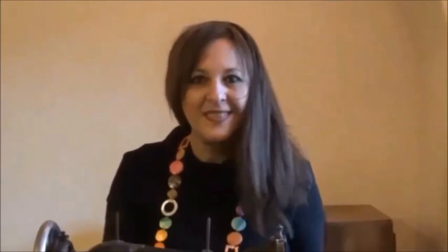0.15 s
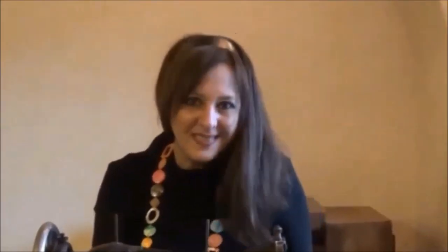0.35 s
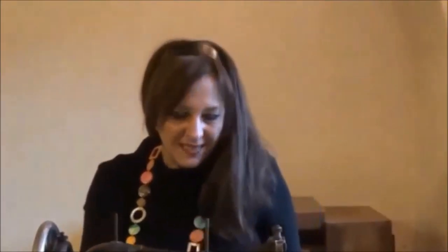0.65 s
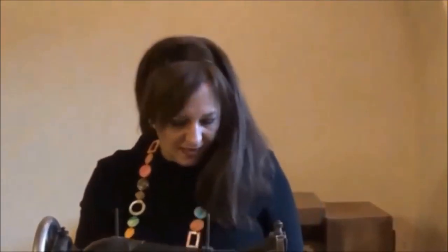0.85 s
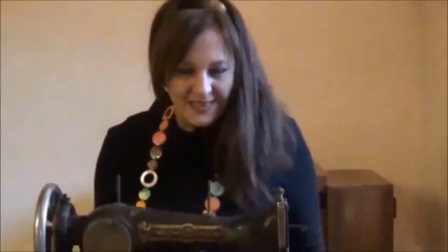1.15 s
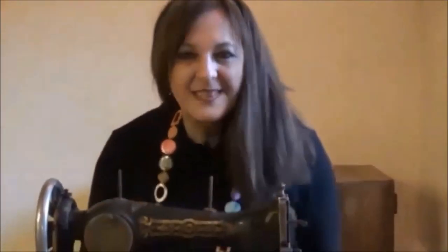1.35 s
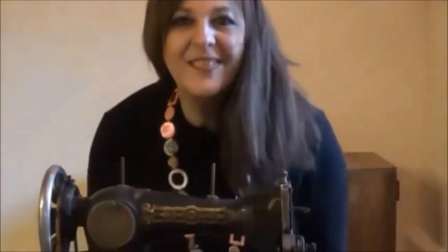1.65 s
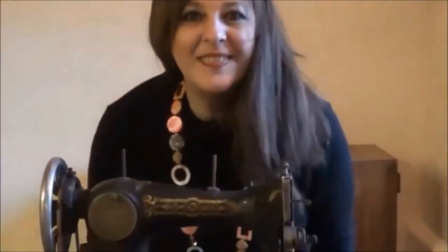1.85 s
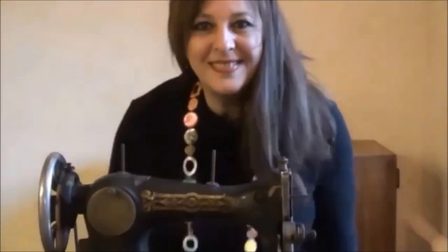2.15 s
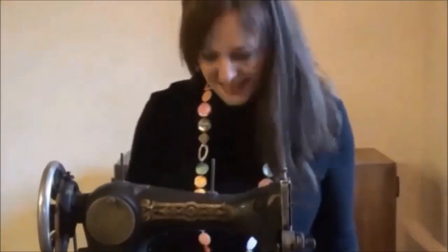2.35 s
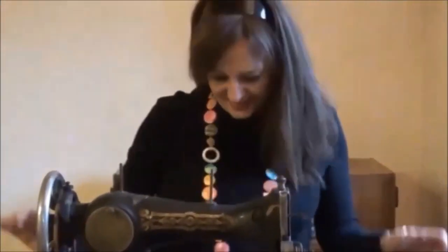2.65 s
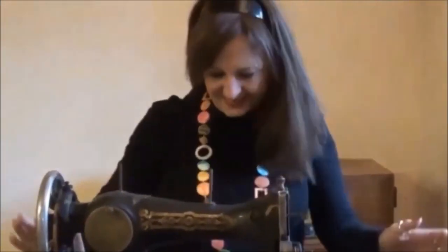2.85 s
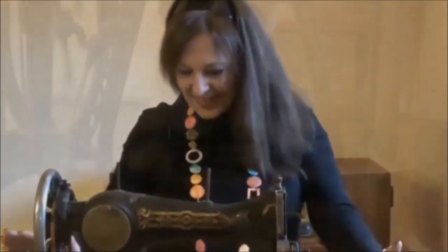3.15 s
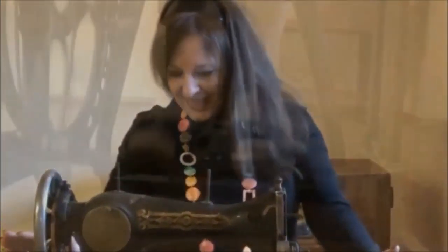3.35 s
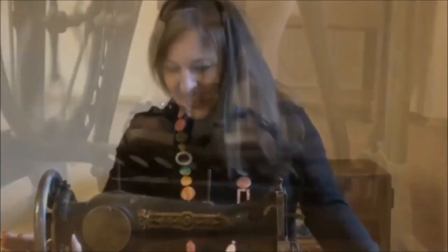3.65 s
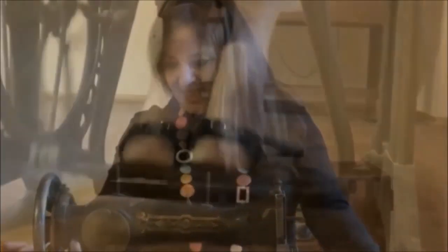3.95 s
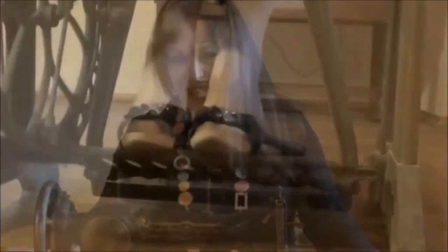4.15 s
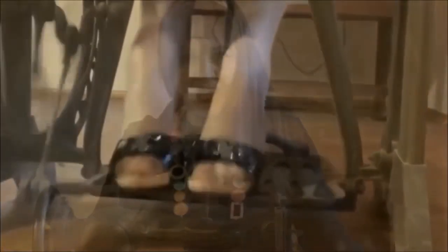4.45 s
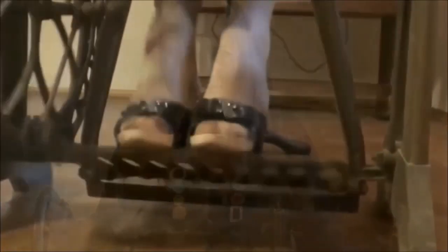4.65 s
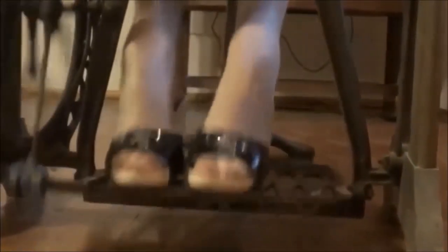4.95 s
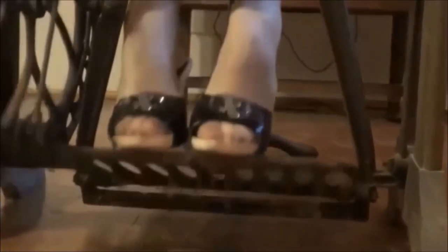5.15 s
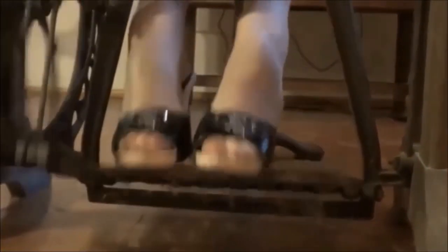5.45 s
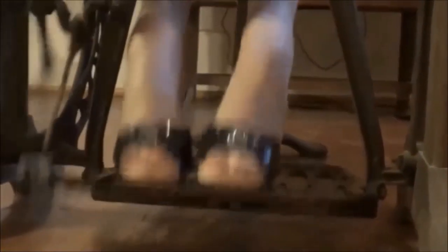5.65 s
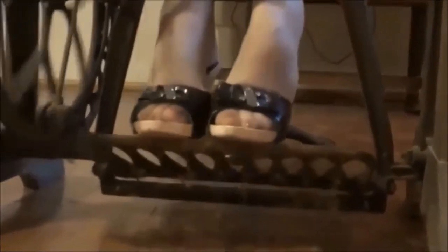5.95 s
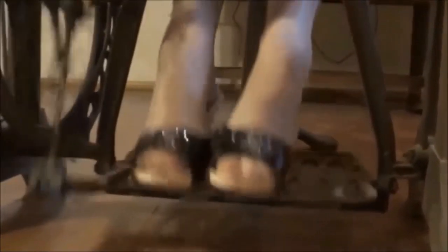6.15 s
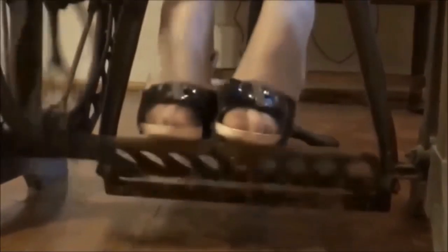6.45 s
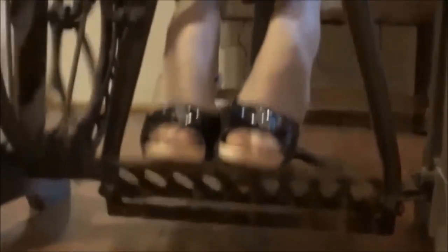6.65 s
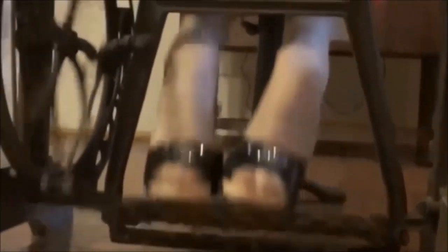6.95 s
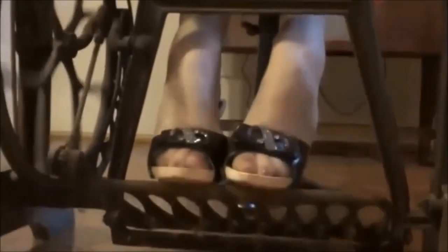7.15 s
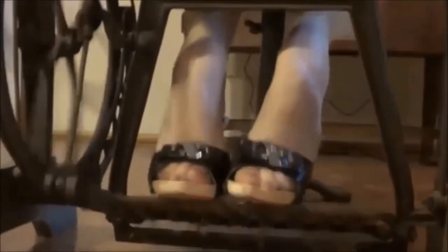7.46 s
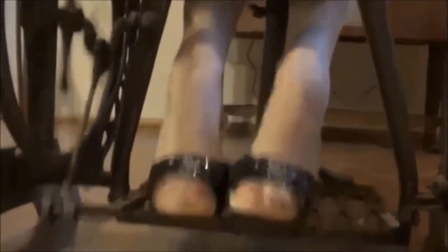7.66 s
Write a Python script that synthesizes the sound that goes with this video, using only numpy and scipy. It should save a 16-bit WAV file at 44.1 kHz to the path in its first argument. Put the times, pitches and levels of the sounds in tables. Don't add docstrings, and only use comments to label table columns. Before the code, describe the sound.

A cast-iron treadle machine in a bare echoing room: uneven knocks and floor thumps, a clanging flurry around two seconds, then spaced double-knock strokes.

```python
import sys
import numpy as np
from scipy import signal
from scipy.fft import rfft, irfft, next_fast_len
from scipy.io import wavfile
from scipy.ndimage import uniform_filter1d, minimum_filter1d

SR = 44100
rng = np.random.default_rng(int(sys.argv[2]) if len(sys.argv) > 2 else 0)


def master(y):
    cut = np.clip(np.atleast_2d(y).T, -1, 1)
    pcm = np.round(cut * 32767)
    wavfile.write(sys.argv[1], SR, pcm.astype(np.int16))


def linear_from_db(decibels):
    return 10 ** (np.asarray(decibels, float) / 20)


N = 343980


def unit(x):
    return x / np.sqrt(np.mean(x ** 2) + 1e-20)


def along(points, hz):
    f, v = np.transpose(points)
    return np.interp(np.log(hz + 1), np.log(f + 1), v)


def filtered(x, response):
    m = next_fast_len(x.shape[-1] + 8192)
    spectrum = rfft(x, m) * response(np.fft.rfftfreq(m, 1 / SR))
    return irfft(spectrum, m)[..., :x.shape[-1]]


def modes(peaks, low_hz=20, top_hz=12000, damping=1):
    def response(f):
        h = 0
        for k, (centre, width, db) in enumerate(peaks):
            drag = 1j * f * width
            h = h + (-1) ** k * linear_from_db(db) * drag / (centre * centre - f * f + drag * damping)
        h = h * f * f / (low_hz ** 2 - f * f + 1.2j * f * low_hz)
        h = h / (1 - (f / top_hz) ** 2 + 1.2j * f / top_hz)
        return h / np.sqrt(np.mean(np.abs(h) ** 2))
    return response


def shape(points):
    return lambda f: unit(linear_from_db(along(points, f)))


def add(track, s, x):
    part = track[round(s * SR):][:len(x)]
    part += x[:len(part)]


def patchy(depth_db, bins, frames):
    z = signal.stft(rng.standard_normal((2, N)), nperseg=512)[2]
    field = uniform_filter1d(rng.standard_normal(z.shape[1:]), bins, axis=0)
    field = uniform_filter1d(field, frames, axis=1)
    return unit(signal.istft(z * linear_from_db(depth_db * unit(field)), nperseg=512)[1][:, :N])


def near(dry):
    return np.array([dry, .5 * np.roll(dry, 60)])


def in_room(sent, t60, build):
    power = sent ** 2
    for tau in (build, t60 / (2 * np.log(1000))):
        pole = np.exp(-1 / (tau * SR))
        power = signal.lfilter([1 - pole], [1, -pole], power)
    return np.sqrt(power) * patchy(depth_db=2.5, bins=2, frames=10)


# time in seconds, level in
# dB.
BACKGROUND = [(.15, -1.5), (1.2, -2.2), (3.5, 0.5), (3.71, -3), (3.77, -6.5), (4.75, -6), (5.4, -1.3), (7, 3.5),
              (7.8, 0.5)]


def background_db():
    s, db = np.transpose(BACKGROUND)
    return np.interp(np.arange(N) / SR, s, db)


# frequency in Hz, density in dB per Hz.
HISS = [(410, -9), (700, -0.5), (2510, -7), (3020, -8), (3350, -5.5), (4480, -10), (9860, -27),
        (11200, -37), (14600, -61), (22000, -120)]


def hiss():
    return linear_from_db(-61.5) * filtered(rng.standard_normal((2, N)), shape(HISS))


# frequency in Hz, density in dB per Hz.
RUMBLE = [(12, -32), (25, -10), (60, -2), (130, -5), (250, 2), (400, -6), (700, -8), (1100, -16),
          (1600, -26), (3300, -120)]


def rumble():
    return linear_from_db(-52 + background_db()) * filtered(rng.standard_normal((2, N)), shape(RUMBLE))


# frequency in Hz, density in dB per Hz.
RUSTLE = [(710, -25), (1200, -14), (1490, -2), (2160, -3.5), (2630, -3), (3930, -10.5), (9830, -5.5),
          (11200, -11.5), (14600, -46), (22000, -120)]
# middle in seconds, half length in seconds, level in dB.
SWISHES = [(.5, 0.13, -60), (.86, 0.052, -48), (1.412, 0.15, -47.5), (1.75, 0.48, -51.5),
           (2.516, 0.16, -50.5), (2.953, 0.5, -50), (3.54, 0.17, -52), (4.332, 0.17, -60.5),
           (5.806, 0.051, -53.5), (6.684, 0.13, -49.5), (7.197, 0.063, -73)]


def rustle():
    t = np.arange(N) / SR
    level = linear_from_db(-63.5 + 0.74 * background_db())
    for middle, half, db in SWISHES:
        level = level + linear_from_db(db - 9.5) * np.exp(-((t - middle) / half) ** 2)
    return level * filtered(patchy(depth_db=1.2, bins=14, frames=20), shape(RUSTLE))


# start in seconds, level in dB, pitch in Hz, body in dB re
DRY_TICKS = [(5.191, -30, 4000, 10), (.3085, -25, 4300, 5), (.425, -45, 8000, -5), (.55, -42, 8500, 5),
             (5.4517, -37, 8500, -15), (5.471, -30, 5000, -5), (5.8024, -36, 9500, -10),
             (5.84, -24, 9500, -10), (5.985, -28, 9000, -10), (5.996, -28, 10000, -10),
             (6.022, -30, 9500, -10), (6.032, -32, 10300, -10), (5.201, -20, 8200, -10),
             (2.214, -34, 9000, -5), (7.1055, -6, 4500, 6), (7.1075, -10, 7500, 0),
             (3.324, -28, 4300, 10), (.839, -22, 3000, 8),
             (0.3142, -16.5, 4300, 9.5), (0.3571, -37, 9900, -2), (1.6944, -20, 4020, -4),
         (1.703, -16, 4430, 10), (2.234, -30, 4110, 8), (4.9343, -19, 4040, -7), (5.234, -10, 9900, 11),
         (5.4271, -29.5, 6000, 10), (5.4778, -11, 4300, 6), (5.5215, -35, 5980, 11),
         (5.878, -19.5, 7500, 1.5), (6.7993, -27, 4900, 16), (6.8704, -52, 4500, 26.5),
         (7.2535, -25, 10100, -14), (7.3776, -32, 10300, -23), (7.3991, -38, 8450, 2.1),
         (7.5494, -50, 4180, 3), (7.659, -52, 7490, 23), (7.6904, -30.5, 8800, -8), (7.7228, -26, 9300, -8),
         (7.7842, -28, 9100, -15)]
# start in seconds, level in dB, pitch in Hz, body in dB re tick.
JANGLES = [(2.2695, -29, 4340, 7), (2.296, -19, 8000, 13), (2.306, -6.5, 8100, 5),
           (2.9153, -28.5, 10000, -20), (4.966, -23.5, 10000, -7), (5.0715, -29.5, 9200, -10),
           (5.316, -27, 4130, 9), (5.7583, -31, 9100, -4), (5.975, -31, 9800, -11), (6.01, -30, 10000, -9),
           (6.397, -33.5, 10700, 1.5), (6.4968, -3.5, 5830, 9), (6.5854, -12, 8900, -5),
           (6.9504, -44, 4400, 17), (7.0439, -19, 10300, -9), (7.591, -18.5, 9100, -12)]


def ticks(rows, t60, room_db):
    dry, sent = np.zeros((2, N))
    t = np.arange(SR // 8) / SR
    for s, db, hz, body_db in rows:
        click = rng.standard_normal(len(t)) * linear_from_db(db - 15.5 - 60 * t / t60) * (1 - np.exp(-t / 0.00098))
        click[30] += 4 * linear_from_db(db - 15.5)
        bright = modes([(hz, 0.14 * hz, 0), (7500, 7000, -28)], low_hz=2570)
        dull = modes([(2020, 3500, 0)], low_hz=600, top_hz=4440)
        add(dry, s, filtered(click, lambda f: bright(f) + linear_from_db(body_db - 1.5) * dull(f)))
        add(sent, s, linear_from_db(room_db) * click)
    room = filtered(in_room(sent, 0.16, build=0.0045), modes([(8700, 14000, 0)], low_hz=3500))
    return near(dry) + room


def loose_parts():
    short = ticks(DRY_TICKS, t60=0.027, room_db=-15)
    return short + ticks(JANGLES, t60=0.066, room_db=-4)


# start in seconds, level in dB, board pitch in Hz,
# rebound delay in seconds, rebound in dB re blow.
STROKES = [
    (5.1955, -10.5, 380, 0.032, -8.5),
    (5.831, -14.5, 405, 0.03, -3),
    (6.483, -10, 294, .024, 1.5),
    (7.106, -13, 333, 0.029, -1.5),
]
# start in seconds, frame in dB, plate in dB re frame,
# brightness in dB re frame, direct sound in dB re room.
KNOCKS = [(0.838, -17, -10, -15, -2.5), (1.446, -19.5, -7, -22.5, -3), (1.607, -14.5, -8, -20.5, -1.5),
          (2.208, -25, -10, -14, -4), (2.243, -23, -11, -11.5, -7), (2.306, -12, -2.5, -6, -7.5),
          (2.365, -15, -3, -3, -5), (3.3235, -26, 3, -13, 3), (4.077, -39, -2.2, -18, 1.5),
          (4.247, -38, 4.5, -4.5, -5), (5.02, -29, -7.5, -12, 4), (6.641, -24, -9, -13, -3),
          (7.416, -34, -1, -18, -3), (7.491, -43, 10, 3, 2.1)]
# start in seconds, frame in dB, plate and brightness in dB re frame.
SHAKES = [(0.35, -44, -2, -12), (0.549, -46, -4, -4), (0.822, -36, 2, -12), (6.457, -32.5, -6, -14),
          (1.215, -58, -11, 7), (1.407, -46, 0, -3), (1.502, -25, -26, -33), (1.672, -27, -22, -16.5),
          (1.882, -35.5, 3, 7), (1.964, -12.5, -2, -7.5), (2.329, -12, -5.5, -7), (2.405, -18, -27, -18),
          (3.09, -48, -16, -38), (5.788, -36.5, 2, -6), (7.075, -34.5, 0.1, -12), (7.76, -46, -9, -10)]
SHAKE_DIRECT_DB = -5.5


def scrape():
    return [(1.892 + k * .016, -21.5 - k * 0.65, -1, 1.5, 7.5 - k, SHAKE_DIRECT_DB) for k in range(5)]


def blows():
    contacts = list(KNOCKS) + [(*row, SHAKE_DIRECT_DB) for row in SHAKES]
    for s, db, _, after, less_db in STROKES:
        contacts.append((s, db, -0.35, -7.5, -0.15))
        contacts.append((s + after, db + less_db, -13.5, -16.5, SHAKE_DIRECT_DB))
    crack_db = -9.5
    return scrape() + [(*row[:4], row[3] + crack_db, row[4]) for row in contacts]


def rattle(length, grain_db):
    t = np.arange(SR // 8) / SR
    grain = np.repeat(rng.standard_normal(len(t) // 40 + 1), 40)[:len(t)]
    return unit(rng.standard_normal(len(t)) * linear_from_db(grain_db * grain)) * np.exp(-(t / length) ** 2)


# frequency in Hz, width in Hz, level in dB.
FRAME = [(498, 32.6, -0.5), (581.4, 28.4, 2.5), (661.5, 52, 0.5), (736, 53, 0.5), (879, 83, -2)]
# frequency in Hz, width in Hz, level in dB.
PLATE = [(992, 47, 3), (1137, 97, -1), (1330, 130, -1), (1489, 43.5, 2.5), (1541, 67, -0.5),
         (1725, 35, -2.5)]
# frequency in Hz, width in Hz, level in dB.
LINKAGE = [(1878, 147, 12), (2290, 170, 10), (2680, 180, 5.5), (3380, 300, 0), (3515, 260, -4.5),
           (4300, 800, -6), (4700, 900, -8)]
# frequency in Hz, density in dB per Hz.
CRACK = [(1500, -60), (2500, -10), (3300, 0.5), (4300, -3.5), (5500, -9), (7000, -8.5), (9700, -9),
         (11200, -21), (14600, -42), (22000, -120)]
ROOM_T60_S = [0.58, 0.53, 0.57, 0.59, 0.54]


def softly_struck(part, contact_hz=2600):
    return lambda f: part(f) / (1 - (f / contact_hz) ** 2 + 1.4j * f / contact_hz)


def knocks():
    dry, sent = np.zeros((2, 4, N))
    for s, db, plate_db, linkage_db, crack_db, direct_db in blows():
        snap, shake = rattle(0.0018, grain_db=1.0), rattle(0.0065, grain_db=-2)
        snap = 0.68 * snap
        snap[0] += 6.13
        levels_db = db + 1.5, db + plate_db + 0.5, db + linkage_db + 1.5, db + crack_db + 4.5
        for part, level_db in enumerate(levels_db):
            add(dry[part], s, linear_from_db(level_db + direct_db) * snap)
            add(sent[part], s, linear_from_db(level_db) * shake)
    dry *= linear_from_db([[4], [4], [2], [-9]])
    iron = (FRAME, 400, 1100), (PLATE, 800, 2100), (LINKAGE, 1500, 6000)
    frame, plate, linkage = [modes(*part, damping=1.74) for part in iron]
    snapping = [softly_struck(frame), softly_struck(plate), linkage, modes([(7700, 3400, 0)], low_hz=4000)]
    split_hz, top_t60 = 7500, 0.32
    ringing_on = [modes(*part) for part in iron] + [lambda f: shape(CRACK)(f) / (1 + (f / split_hz) ** 4)]
    out = filtered(in_room(sent[3], top_t60, build=0.00035),
                   lambda f: 1.13 * shape(CRACK)(f) / (1 + (split_hz / (f + 1)) ** 4))
    for k in range(4):
        out = out + filtered(near(dry[k]), snapping[k])
        out = out + filtered(in_room(sent[k], ROOM_T60_S[k + 1], build=0.00047), ringing_on[k])
    return out


# start in seconds, level in dB, board pitch in Hz, joists in dB re board.
THUMPS = [(0.402, -25, 151, -12), (0.82, -29.5, 162, -25), (0.841, -18.5, 253, -37),
          (1.294, -41.5, 320, -24), (1.444, -21, 374, -31), (1.606, -11, 265, -30), (1.659, -14, 280, -43),
          (1.822, -35.5, 376, -37), (1.957, -14.5, 218, -22.5), (2.207, -14.5, 130, -8.5),
          (2.311, -10.5, 197, -24), (2.385, -9.5, 276, -36), (1.408, -33.5, 200, -16),
          (3.088, -31, 201, -33), (3.485, -32, 188, -29), (4.302, -32, 126.5, -9.5), (4.852, -30, 225, -21),
          (4.972, -24.5, 370, -14.5), (5.032, -19.5, 255, -10), (5.066, -25.5, 263, -23),
          (5.269, -16, 200, -17.5), (5.787, -33, 385, -25), (6.096, -38.5, 264.7, 1.5),
          (6.312, -36.5, 240, -19), (6.648, -20, 300, -15), (6.825, -33, 127, -8), (7.075, -28.5, 363, -15),
          (7.249, -27, 371, -20), (7.434, -26.5, 307, -7.5), (7.766, -34, 261, -27)]


def pushes():
    rows = list(THUMPS)
    for s, db, hz, after, less_db in STROKES:
        rows.append((s + .003, db, hz, -18))
        rows.append((s + after, db + less_db - 1, hz, -18))
    return rows


# frequency in Hz, width in Hz, level in dB.
BOARDS = [(138.4, 18.8, -0.5), (192.7, 25.7, -2.5), (256, 41.4, -1), (326, 48.4, -2), (402.8, 48, -2)]
# frequency in Hz, width in Hz, level in dB.
JOISTS = [(35, 25, -13), (59.4, 22, -6), (81.5, 13, -1.5), (106, 9.2, 6.5)]


def thumps():
    out, deep = np.zeros((2, 2, N))
    t = np.arange(SR * 3 // 4) / SR
    for s, db, hz, joists_db in pushes():
        push = np.exp(-(t / 0.031) ** 2)
        push = push + 1.455 * linear_from_db(-60 * t / ROOM_T60_S[0]) * (1 - np.exp(-t / 0.028))
        impact = 22.5 * (t == 0) * [[1], [.5]]
        pair = linear_from_db(db - 8.5) * (push * rng.standard_normal((2, len(t))) + impact)
        scatter_db = 3.13 * rng.standard_normal(len(BOARDS))
        loaded = [(centre, width, level_db + more_db - 6 * abs(np.log2(centre / hz)))
                  for (centre, width, level_db), more_db in zip(BOARDS, scatter_db)]
        sway = linear_from_db(db + joists_db - 4.5 - 60 * t / 0.82) * rng.standard_normal((2, len(t)))
        answer = filtered(pair, modes(loaded, low_hz=99, top_hz=477))
        for k in range(2):
            add(out[k], s, answer[k])
            add(deep[k], s, sway[k])
    return out + filtered(deep, modes(JOISTS, top_hz=140))


def ringing(rows):
    out = np.zeros((2, N + SR))
    t = np.arange(SR * 3 // 4) / SR
    slow = shape([(0, 0), (16, 0), (45, -40), (22000, -120)])
    for s, hz, db, t60 in rows:
        rough = 1 + .45 * filtered(rng.standard_normal((2, len(t))), slow)
        envelope = linear_from_db(db - 60 * t / t60) * (1 - np.exp(-t / 0.001))
        tone = np.sin(2 * np.pi * (hz * t + rng.random((2, 1))))
        out[:, round(s * SR):][:, :len(t)] += rough * envelope * tone
    return out[:, :N]


# start in seconds, mode in Hz, level in dB, t60 in seconds.
BODY = [(.402, 156, -30, .5), (.402, 215, -31, .5), (3.3235, 834, -17, .045), (3.3235, 1540, -14, .04),
        (3.3235, 2200, -21, .025), (3.324, 4600, -40, .015), (6.65, 500, -9, .1), (6.639, 860, -20, .12),
        (6.641, 1150, -24, .06), (.402, 260, -24, .1), (.52, 250, -30, .15), (.402, 40, -44, .6),
        (7.107, 3600, -26, .04), (7.107, 1500, -21, .15), (.84, 1700, -32, .1), (.84, 2700, -38, .12),
        (1.503, 900, -28, .06), (1.673, 600, -22, .06), (2.243, 950, -24, .08), (4.3, 87, -48, .6),
        (7.107, 334, -17, .3), (7.107, 571, -20, .3), (7.225, 985, -28, .4), (6.69, 1980, -41, .2),
        (2.366, 2725, -30, .7), (2.366, 2530, -36, .3), (2.366, 3375, -40, .3), (2.209, 135, -16, .4),
        (2.39, 251, -20, .4), (2.39, 400, -23, .4), (5.479, 9950, -59, .3), (1.608, 2050, -30, .05),
        (1.619, 2000, -30, .04), (1.446, 1150, -24, .04), (.318, 750, -38, .05), (5.834, 580, -24, .3),
        (1.96, 650, -26, .3), (7.42, 1100, -38, .2), (6.8, 2400, -30, .03), (2.364, 2320, -22, .06),
        (2.364, 1650, -24, .06), (2.31, 3650, -26, .04), (2.209, 200, -18, .1), (5.25, 1010, -30, .5),
        (7.724, 8900, -52, .2), (7.592, 8900, -46, .15)]


def body():
    return ringing(BODY)


# start in seconds, end in seconds, low mode in Hz, low mode in dB,
# high mode in dB.
DRIVE = [
    (.44, .7, 2630, -58, -62),
    (.95, 1.189, 2680, -54.5, -62),
    (1.19, 1.32, 2080, -57, -55),
    (1.32, 2.6, 2735, -68, -58),
    (2.6, 3.05, 2520, -61, -56.5),
    (3.05, 3.3, 2500, -55.5, -59),
    (3.3, 4.55, 2600, -55, -59),
    (4.55, 5.35, 2495, -58.5, -64),
    (5.35, 5.8, 2570, -50.5, -66),
    (5.8, 6.6, 2610, -66, -61),
]


def drive():
    t = np.arange(N) / SR
    step = (t + .01) * 25
    blip = np.exp(-((step % 1 - .5) / 25 / 0.0049) ** 2)
    uneven_db, swell_db = 2.5, 1.5
    chance = rng.standard_normal((4, 200))
    chance += swell_db / uneven_db * uniform_filter1d(chance, size=7, axis=1)
    low, high, low_wander, high_wander = chance[:, step.astype(int)]
    high_tone = np.sin(2 * np.pi * (3360 + 50 * high_wander) * t)
    tone = np.zeros(N)
    for start, end, hz, low_db, high_db in DRIVE:
        low_tone = np.sin(2 * np.pi * (hz + 14 * low_wander) * t)
        both = linear_from_db(low_db + uneven_db * low) * low_tone + linear_from_db(high_db + uneven_db * high) * high_tone
        tone += both * (t >= start) * (t < end)
    return blip * tone * np.array([[1], [.5]])


# start in seconds, mode in Hz, level in dB.
STEEL = [(2.366, 2702, -19), (2.366, 2672, -30), (2.366, 4124, -31.5), (2.366, 4221, -29),
         (4.246, 700, -41.5), (.84, 2266, -43.5), (.84, 627, -24), (3.324, 761, -35), (7.491, 890, -40),
         (7.491, 1330, -45.5), (5.197, 1005, -23), (7.108, 990, -20.5), (5.834, 412, -21.5)]
# frequency in Hz, level in dB.
TREADLE = [(409, -2.5), (575, -4), (1007, -7), (1292, -12), (1534, -17), (2336, -24)]


def steel():
    struck = list(STEEL)
    for s, db, *_ in STROKES:
        for hz, mode_db in TREADLE:
            struck.append((s, hz, db + mode_db - 14.5 + 5.5 * rng.standard_normal()))
    return ringing([(*row, 0.49) for row in struck])


# frequency in Hz, left-right likeness from 0 to 1.
ALIKE = [(30, 0.85), (60, .97), (170, .98), (490, 0.96), (1390, 0.64), (3950, 0.52), (11300, 0.8)]
# frequency in Hz, lead in radians.
LEAD = [(30, 0.6), (125, 0.62), (300, 0.85), (700, 0.6), (2000, 0.25), (7000, 0.1)]


def scene():
    both = hiss() + rumble() + rustle() + loose_parts() + knocks() + thumps() + body() + drive() + steel()

    def share(hz):
        turn = np.arccos(np.clip(along(ALIKE, hz), -1, 1)) / 2
        return np.array([np.cos(turn), np.sin(turn)])

    def lead(hz):
        return np.exp(.5j * np.outer([1, -1], along(LEAD, hz)))

    mid, side = filtered(both, share)
    return filtered(np.array([mid + side, mid - side]), lead)


def roll_off(x):
    return signal.sosfilt(signal.butter(12, 15200, fs=SR, output="sos"), x)


def record(dry):
    recovery_db = 90 * np.arange(N) / SR
    peak_db = 20 * np.log10(np.abs(dry).max(0) + 1e-9)
    held_db = np.maximum.accumulate(peak_db + recovery_db) - recovery_db
    gain = linear_from_db(1.01 * np.minimum(0, -5.5 - held_db))
    gain = uniform_filter1d(minimum_filter1d(gain, size=90), size=90)
    kept = filtered(dry * gain, lambda hz: np.where(hz < 11150, 1, linear_from_db(-20.5)))
    mix = kept * (np.arange(N) > .151 * SR)
    return roll_off(mix)


dry = scene()
out = record(dry)
master(out)
```